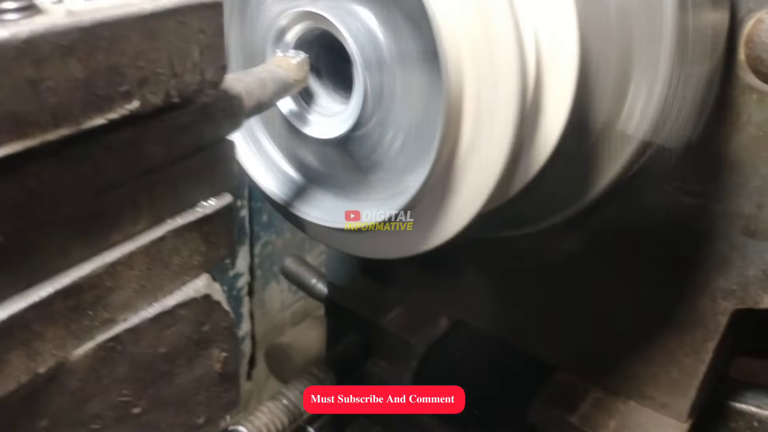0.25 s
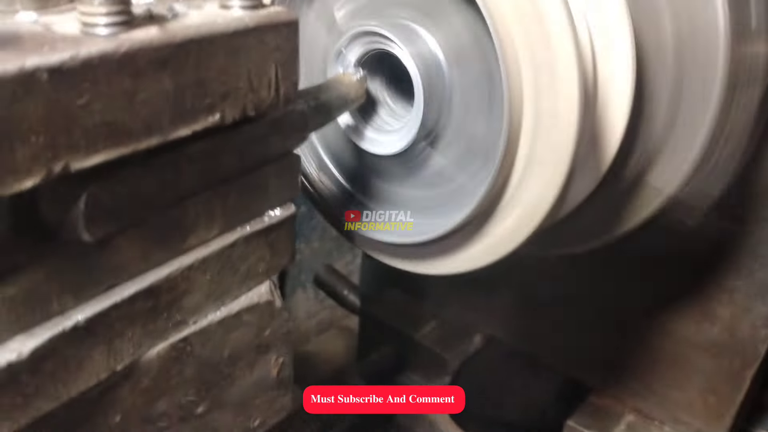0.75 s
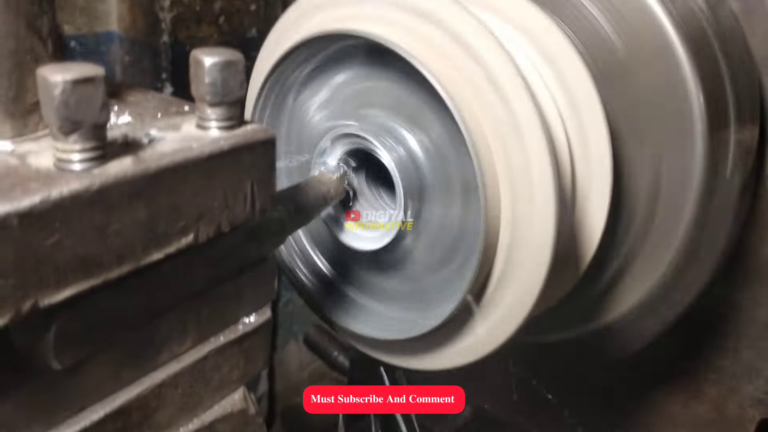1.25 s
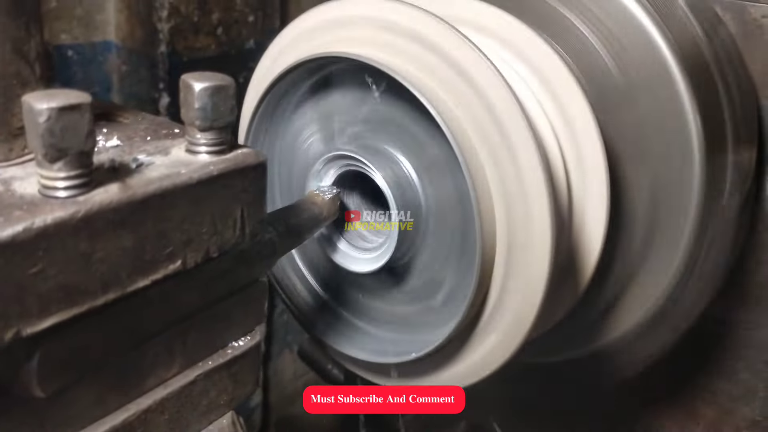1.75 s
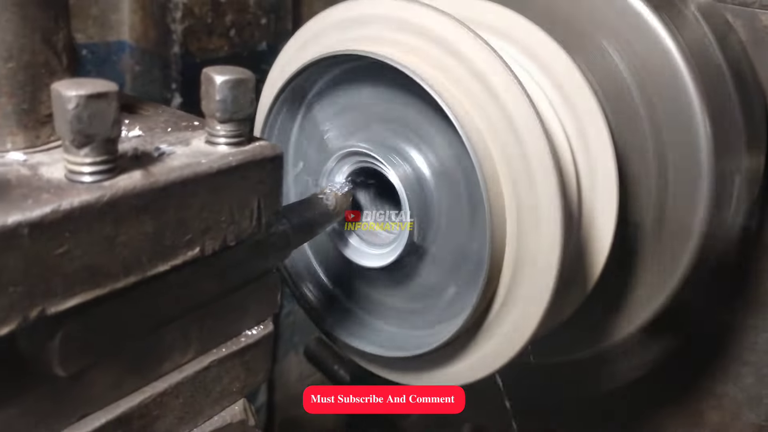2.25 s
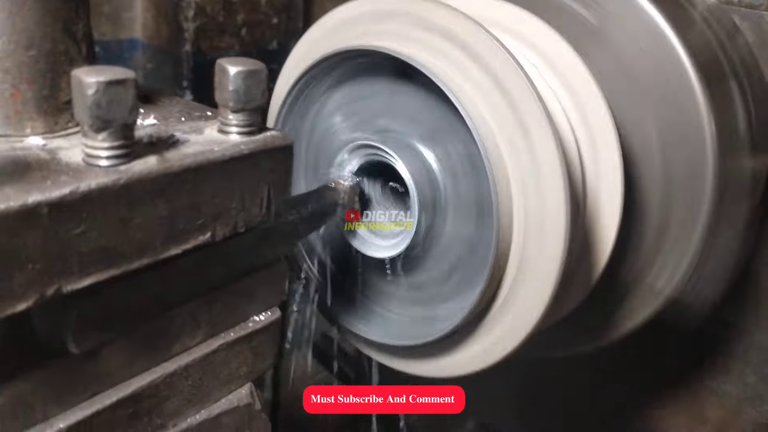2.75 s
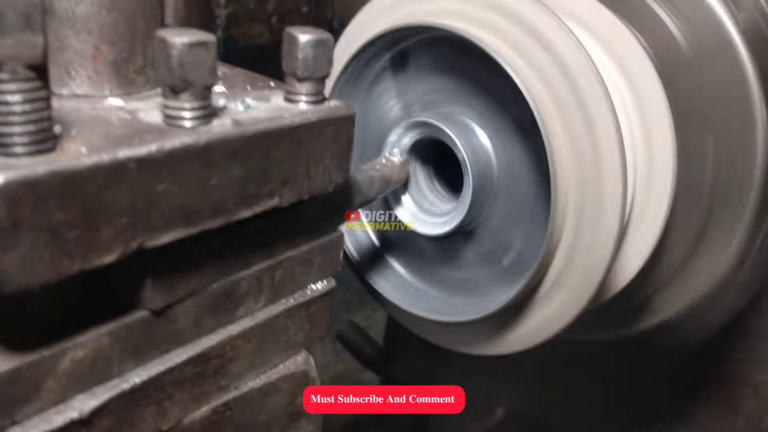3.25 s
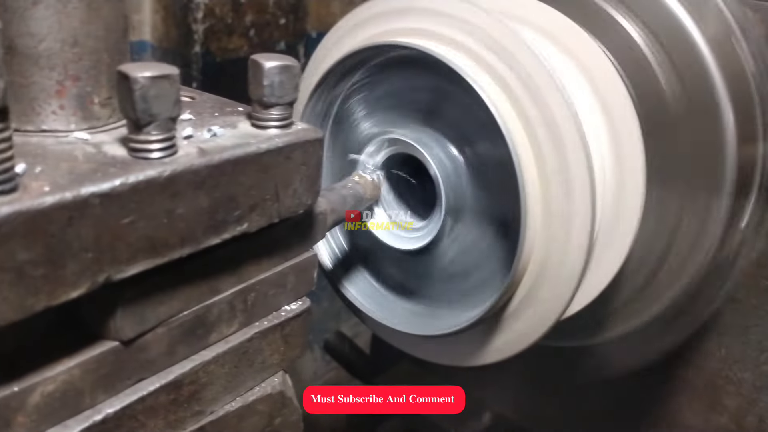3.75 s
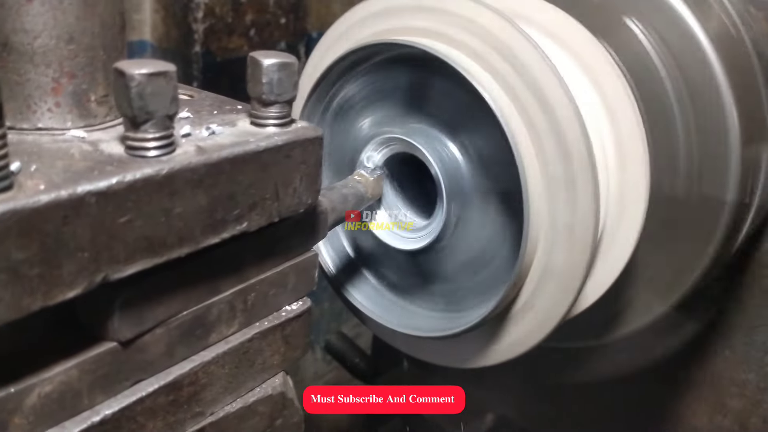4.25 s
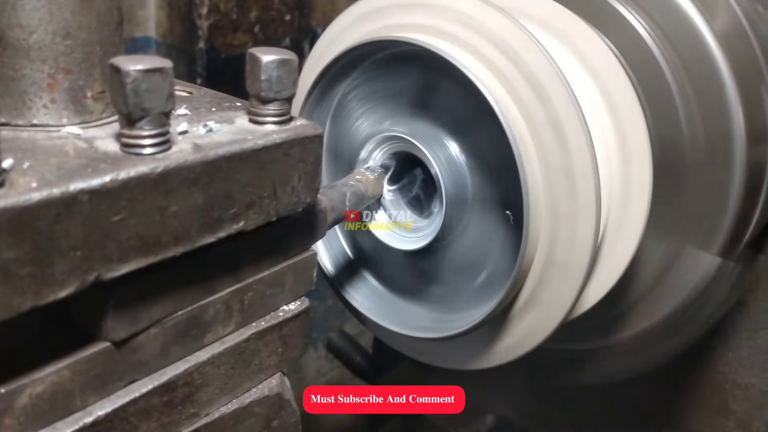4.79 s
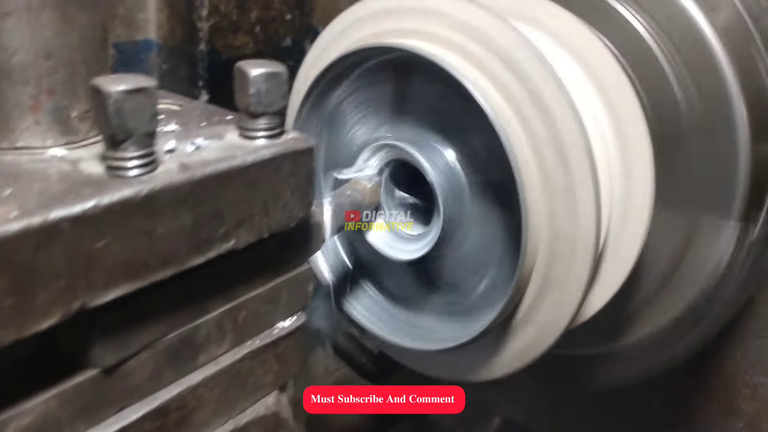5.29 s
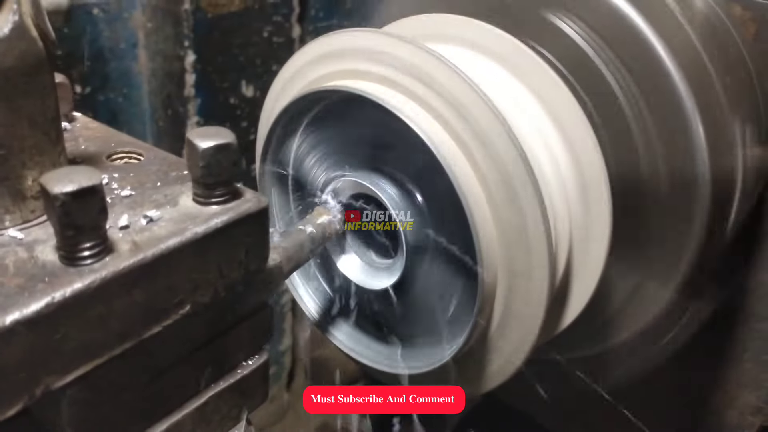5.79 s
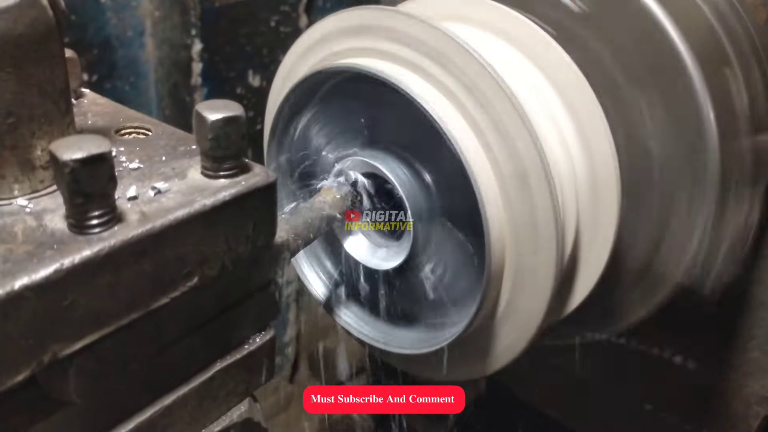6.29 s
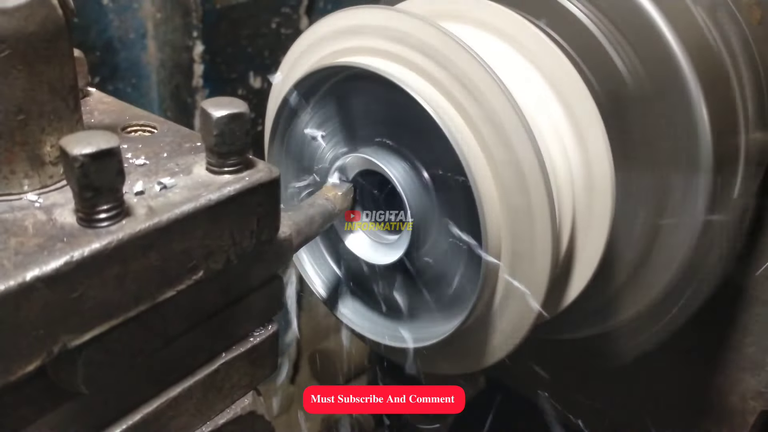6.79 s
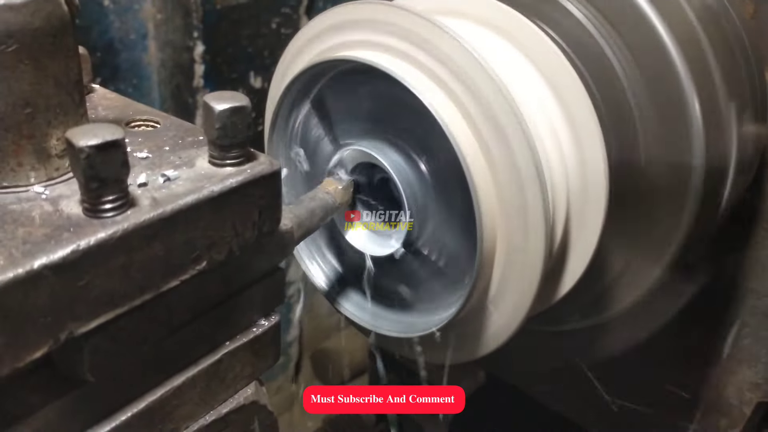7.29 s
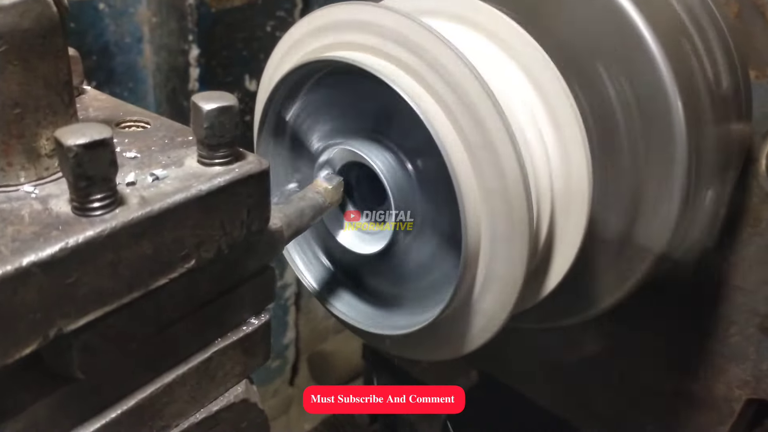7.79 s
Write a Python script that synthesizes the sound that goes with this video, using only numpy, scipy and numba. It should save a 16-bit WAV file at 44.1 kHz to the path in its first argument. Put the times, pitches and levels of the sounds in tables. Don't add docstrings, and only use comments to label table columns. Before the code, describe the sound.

Close beside an old metal lathe in a workshop, the drive hums and rumbles with rapid, uneven gear knocks. A boring tool rasps lightly inside a spinning metal wheel in two passes, chips sizzling and the tip ringing in bursts. Then it locks into a very loud, piercing squeal, stuttering and wavering, pushing everything else down, until the edge leaves and only faint ringing and machinery remain.

```python
import sys
import numpy as np
from scipy import signal
from scipy.fft import rfft, irfft, next_fast_len
from scipy.io import wavfile
from scipy.ndimage import uniform_filter1d, minimum_filter1d, map_coordinates
from numba import njit

SR = 44100
rng = np.random.default_rng(int(sys.argv[2]) if len(sys.argv) > 2 else 0)


def wav_out(sig):
    wavfile.write(sys.argv[1], SR, np.round(np.clip(np.atleast_2d(sig).T, -1, 1) * 32767).astype(np.int16))


def voltage_ratio(level):
    return 10 ** (np.asarray(level, float) / 20)


N = 354563

# time_s, level_db
SQUEAL_LEVEL = [(5.002, -13), (5.25, -11.5), (5.548, -15.5), (6.0, -11), (6.18, -10.5), (6.448, -6),
                (7.151, -9), (7.6, -12.5), (7.64, -27), (7.72, -40), (7.781, -38)]
# time_s, pitch_hz
SQUEAL_PITCH = [(5.05, 2780), (5.087, 2725), (5.115, 2770), (5.14, 2728), (5.185, 2790), (5.25, 2780),
                (5.283, 2722), (5.36, 2805), (5.425, 2705), (5.49, 2800), (5.565, 2740), (5.63, 2795),
                (5.697, 2700), (5.775, 2820), (5.835, 2695), (5.92, 2760), (5.98, 2680), (6.08, 2770),
                (6.125, 2700), (6.16, 2735), (6.22, 2690), (6.3, 2745), (6.45, 2762), (6.54, 2728),
                 (6.73, 2772), (6.8, 2725), (6.92, 2762), (6.97, 2735), (7.04, 2765), (7.11, 2722),
                 (7.2, 2740), (7.29, 2785), (7.38, 2730), (7.475, 2705), (7.575, 2825), (7.65, 2775)]
# time_s, depth_db, width_ms
SQUEAL_DIPS = [(5.114, -8.5, 8.8), (5.169, -21, 18), (5.179, -9.5, 5.1), (5.18, -3, 68), (5.22, -26, 5.8),
                    (5.228, -4.5, 45), (5.319, -22, 11), (5.338, -10, 5.5), (5.355, -12, 61),
                    (5.358, -10.5, 5), (5.366, -14, 2.5), (5.385, -15, 12), (5.446, -2, 14), (5.462, -11.5, 6),
                    (5.479, -11.5, 9.5), (5.485, -8, 34), (5.505, -11, 14), (5.526, -20.5, 3.4),
                    (5.572, -3, 11), (5.592, -6, 11), (5.608, -17, 5.2), (5.634, -5, 12), (5.67, -16, 5.4),
                    (5.727, -15, 11), (5.756, -5.5, 8.7), (5.778, -14.5, 4.7), (5.79, -19.5, 2.9),
                    (5.804, -17.5, 4.1), (5.845, -15.5, 2.4), (5.857, -14, 5.2), (5.877, -10, 9),
                    (5.899, -1.5, 15), (5.935, -12, 5.1), (5.949, -8, 7.7), (5.99, -8.5, 3.2),
                    (6.023, -6.5, 7), (6.043, -6.5, 5.5), (6.064, -21.5, 4.6), (6.072, -17.5, 5),
                    (6.075, -3.5, 52), (6.091, -15, 2.5), (6.104, -13.5, 2.8), (6.128, -5.5, 4),
                    (6.152, -2.5, 15), (6.176, -15.5, 6.7), (6.205, -6.5, 26),
                    (6.226, -20, 21), (6.358, -9, 17), (6.451, -1, 15), (6.501, -20, 11), (6.519, -7, 4.2),
                       (6.562, -6, 22), (6.592, -5, 9.6), (6.636, -11.5, 15), (6.667, -1.5, 4.8), (6.734, -2, 11),
                       (6.785, -13.5, 16), (6.838, -0.5, 18), (6.871, -4.5, 11), (6.916, -6, 26),
                       (6.945, -1, 7.7), (6.982, -8, 4.6), (7.015, -7.5, 17), (7.056, -14.5, 23),
                       (7.087, -4.5, 20), (7.108, -6, 6), (7.119, -12.5, 6.7), (7.131, -6, 3.5),
                       (7.156, -15, 4.2), (7.166, -5.5, 4.4), (7.201, -11, 20), (7.242, -9.5, 4.5), (7.26, -8, 5),
                       (7.274, -22, 3.8), (7.28, -5, 5.4), (7.295, -13, 13), (7.309, -12, 4.6), (7.339, -10, 5.4),
                       (7.394, -22.5, 3.4), (7.41, -14.5, 19), (7.42, -5, 71), (7.431, -7, 3.9), (7.484, -22, 6),
                       (7.53, -12, 8), (7.548, -24.5, 10), (7.557, -19, 6.7), (7.565, -8.5, 73),
                       (7.583, -16, 4.9), (7.594, -13, 4.6), (7.626, -18, 15), (7.654, -13, 8.5),
                    (5.062, -5, 20), (5.236, -4.5, 25), (5.392, -7.5, 11), (5.453, -7.5, 15), (6.235, -3, 9.1),
               (6.489, -3, 30), (6.62, -1.5, 35), (6.77, -3, 32), (6.9, -2.5, 30), (7.44, -2.5, 32)]
# time_s, firm_grip_gain_db, blur (0-1)
RUNOUT = [
    (5.0, 4, 0.07),
    (5.35, 2.5, 0.14),
    (5.7, 3.5, 0.1),
    (6.1, 0.5, 0.3),
    (6.3, -2, 0.13),
    (6.55, -2, 0.21),
    (7.0, -3, 0.17),
    (7.15, 1.5, 0.19),
    (7.55, 1, 0.14),
]
# time_s, level_db
SLAP_LEVEL = [
    (5.05, -58),
    (5.6, -56.5),
    (5.9, -48),
    (6.13, -45),
    (6.3, -36),
    (6.5, -35),
    (7.0, -38),
    (7.3, -45),
    (7.77, -63.5),
]
# time_s, change_db, width_ms
SLAP_SPELLS = [(5.09, 5, 40), (5.14, 7, 30), (5.285, 13, 55), (5.34, 6, 20), (5.435, 11.5, 45),
               (5.565, 2.5, 40), (5.71, 10.5, 50), (5.86, 3.5, 50), (5.965, 13, 35), (6.03, 7.5, 40),
               (6.185, 13.5, 70), (6.26, 3.5, 40), (6.35, -7, 15), (6.53, 0.5, 60), (6.73, -4, 25),
               (6.8, 0.5, 30), (6.87, 1, 30), (6.91, -4, 25), (6.97, 1.5, 25), (7.03, -0.5, 40),
               (7.1, 4, 30), (7.18, 5.5, 40), (7.24, -3, 20), (7.265, 5, 20), (7.36, 7.5, 60),
               (7.47, 19, 40), (7.56, 7, 30), (7.61, 3, 30)]
# multiple, level_db
OVERTONES = [
    (3, -6),
    (4, -0.5),
    (5, -2),
]
# time_s, level_db
HARSHNESS = [
    (5.05, 4),
    (5.5, 2.5),
    (6.1, 0.5),
    (6.25, 2),
    (7.15, 0.5),
    (7.3, -4),
    (7.47, -6),
    (7.6, -3),
]
# time_s, bite_db, chip_heat_db
CUT_FORCE = [(0, -33, -85.5), (.39, -41, -92), (.41, -24, -72.5), (.9, -24.5, -77), (1.5, -25.5, -73),
             (2.2, -27, -67), (2.48, -26.5, -71), (2.58, -38.5, -89), (3.3, -37.5, -89.5),
             (3.38, -27, -72.5), (3.8, -24, -74.5), (4.8, -23, -74.5), (4.86, -24, -66),
             (5.5, -26.5, -57.5), (6.1, -28, -57.5), (6.35, -30, -57.5), (7.2, -33, -58.5),
             (8.04, -35, -73.5)]
# centre_hz, width_hz, level_db
BAR_MODES = [
    (1128, 190, -6.5),
    (1833.6, 56, 5),
    (2507, 530, -4),
    (2840, 140, -3),
    (2400, 2930, -6.5),
]
# centre_hz, width_hz, level_db
CHIP_MODES = [
    (3702, 46, -4),
    (4500, 300, -20),
    (4910, 360, -18.5),
    (5450, 760, -24.5),
    (6540, 36, -32),
    (7370, 120, -26),
    (8090, 60, -31),
]
# pitch_hz, level_db (per Hz)
CHIP_BED = [(1710, -18), (2900, -1.5), (3100, -21), (3300, -15), (3710, -14), (4180, -27), (7410, -42.5),
            (9000, -50), (11700, -85), (19800, -120)]
# centre_hz, width_hz, level_db
SIZZLE_MODES = [(6370, 400, -5), (7170, 230, -2.5), (8050, 250, -6), (9720, 330, -3), (10440, 300, -4),
                (11350, 440, -8.5), (11950, 540, -4.5), (13000, 200, -14), (13600, 400, -4.5)]
# centre_hz, width_hz, level_db
TOP_MODES = [
    (14450, 200, 3),
    (14300, 1200, -6.5),
    (15400, 80, -4.5),
]
# time_s, depth_db, width_ms
SKIPS = [
    (.43, -18, 11),
    (.465, -10.5, 18),
    (.5, -15, 18),
    (.545, -5, 11),
    (3.357, -14, 12),
]
# time_s, level_db
CHIP_SNAP = [
    (4.8635, -24),
]
# time_s, centre_hz, level_db
TIP_RINGING = [
    [(.4, 2630, -21), (.6, 2637, -30), (1, 2622, -28), (1.58, 2675, -27.5), (1.95, 2698, -20.5),
     (2.4, 2712, -25), (2.53, 2560, -28)],
    [(3.33, 2620, -19), (3.4, 2582, -19.5), (3.75, 2616, -24), (4, 2690, -19), (4.3, 2636, -24.5),
     (4.55, 2690, -21), (4.8, 2787, -18.5), (5.04, 2776, -18.5)],
    [(7.66, 2830, -30), (7.72, 2840, -20), (7.8, 2865, -21), (7.89, 2853, -22), (8.04, 2840, -32)],
]
# wide_band_share, burst_depth_db, burst_time_s
TIP_KIND = [
    (1.5, 3.5, 0.0037),
    (1.5, -0.4, .012),
    (0.23, 3.5, 0.017),
]
# start_s, peak_db, pitch_hz
GRABS = [(0.4124, -16, 2510), (0.443, -9.5, 2310), (0.4747, -14, 2650), (0.5176, -15, 2600),
         (0.564, -4, 2380), (0.686, -12, 2370), (1.0833, -13, 2310), (1.1202, -6.5, 2390),
         (1.2547, -12, 2410), (1.6859, -12, 2350), (1.7653, -9.5, 2600), (1.9716, -4, 2640),
         (2.1134, -11, 2690), (2.1469, -4.5, 2740), (2.302, -19, 2670), (2.6597, -16, 2640),
         (2.8855, -24, 2390), (3.1576, -23, 2370), (3.34, -18, 2660), (3.386, -14, 2580),
         (3.5129, -8, 2610), (3.6022, -11, 2430), (3.7923, -10.5, 2700), (3.8992, -10, 2650),
         (4.0215, -16, 2680), (4.131, -16, 2570), (4.2905, -13, 2570), (4.8554, -11, 2830),
         (4.981, -8, 2830), (5.0533, 0, 2780)]
# start_s, peak_db
BAR_JOLTS = [(0.4067, -19), (0.5107, -10), (1.0615, -18), (1.207, -13), (1.254, -18), (1.445, -16),
             (1.627, -12), (1.7654, -20), (1.906, -11), (2.0427, -21), (2.0975, -12), (2.188, -15),
             (2.4646, -13), (2.6547, -14), (2.8827, -13), (3.1612, -18), (3.273, -12), (4.1414, -5),
             (4.224, -17), (4.293, -18), (6.8207, -12.5), (7.3802, -14), (7.5276, -21), (7.662, -17),
             (7.7137, -13), (7.991, -22)]
# time_s, pitch_hz, level_db
SHANK_HUM = [
    (.5, 2370, -36),
    (.56, 2370, -28),
    (1.15, 2365, -25.5),
    (1.3, 2330, -32),
    (1.75, 2330, -27),
    (2.0, 2370, -28),
    (2.5, 2310, -35),
]
# time_s, level_db
HOLDER_WHISTLE = [
    (3.37, -56),
    (3.6, -60),
    (3.8, -62.5),
    (4.4, -67),
]
# start_s, peak_db, thud_db, ring_db
LIGHT_KNOCKS = [(.232, -4, 0, -9), (.354, -10, -1, -6), (.508, -6.5, 3, -6), (.648, -3.5, -15, -8),
                (.793, -2.5, -4, -9), (.927, -3.5, -11, -8), (1.207, -1.5, -18, -10),
                (1.323, -20, -11, -22), (1.487, -3.5, -7, -9), (1.628, -6, -19, -7), (1.766, -2.5, -3, -11),
                (1.907, -3.5, 1, -4.5), (2.046, -7, -1, -17), (2.187, -3.5, -1, -4),
                (2.329, -5.5, 0.5, -3.5), (2.463, -6.5, -2.5, -12), (2.606, -5.5, 0, -13),
                (2.718, -17, -13, 3), (2.881, -4, -1.5, -8.5), (2.998, -18.5, -14, 5),
                (3.158, -3, 0.5, -9.5), (3.273, -5.5, -2.5, -19), (3.573, -3, -6.5, -17),
                (4.221, -8.5, -20, -12), (4.791, -7.5, -1.5, -17)]
# start_s, peak_db
LOADED_KNOCKS = [(5.352, -9.5), (5.843, -6.5), (6.121, -5.5), (6.26, -5), (6.403, -14), (6.687, -5),
                 (6.823, -3), (7.102, -5.5), (7.243, -7), (7.381, -3), (7.528, -3.5), (7.664, -3),
                 (7.805, -14), (7.928, -7)]
# start_s, peak_db
REBOUNDS = [(.071, -9), (.565, -22), (.972, -5.5), (1.141, -12), (1.254, -5.5), (1.819, -8), (1.981, -12.5),
            (2.095, -5), (2.652, -5), (3.226, -13), (3.646, -9), (4.074, -11), (4.756, -23), (6.17, -9.5),
            (7.459, -7), (7.6, -6.5), (7.712, -1.5), (7.99, -10)]
# start_s, peak_db
PINGS = [
    (1.061, -12),
    (3.889, -13.5),
    (4.001, -13.5),
    (4.141, -16.5),
    (4.606, -16.5),
    (5.03, -15),
]
# pitch_hz, level_db, t60_s
CASING_MODES = [(346.7, -12.5, 0.33), (527, -11.5, 0.19), (653, -4.5, 0.11), (722, -13, 0.17),
                (976, 3.5, 0.13), (1049, 3.5, 0.18), (1253, 5.5, 0.11), (1465, -8, 0.14), (1480, -1, 0.012),
                (1803, 7.5, 0.072), (2320, -4, 0.063)]
# start_s, peak_db
CRACKS = [(0.2325, -14), (0.511, -7), (.649, -17), (1.209, -4), (1.2554, -2), (1.765, -10), (1.818, -4.5),
          (1.906, -2), (2.042, -7), (2.188, -3), (2.652, -8), (2.881, -21), (3.158, -7), (7.662, -8),
          (7.713, -7), (.928, -11), (6.263, -11), (6.69, -6), (6.826, -10), (7.104, -9), (7.93, -24),
          (7.993, -18)]
# pitch_hz, level_db, t60_s
TOOTH_MODES = [
    (1690, 0, 0.018),
    (2320, -7.5, 0.019),
    (912, -6.5, 0.013),
    (567, -13, 0.05),
]
# pitch_hz, level_db, upper_sideband_share, lower_sideband_share (belt sidebands)
MOTOR_LINES = [
    (71.2, -36, 0.58, 0.12),
    (101.6, -37, .05, .05),
    (108.6, -44, 0.37, .1),
    (110.8, -48, 0.39, 0.55),
]
# time_s, level_db
RUMBLE_LEVEL = [(0, -23.5), (1, -27.5), (2, -24.5), (2.6, -25.5), (3.3, -25), (3.8, -30), (5, -31),
                (6, -27.5), (7.4, -27), (7.7, -24), (8.04, -28)]
# pitch_hz, level_db (per Hz)
RUMBLE_COLOUR = [(20, -14), (52, -20), (62, -12), (90, -12), (170, -10.5), (240, -17.5), (400, -15),
                 (560, -10), (1600, -12.5), (2310, -17.5), (2900, -30), (3300, -42), (9000, -70.5),
                 (16000, -100)]
# centre_hz, width_hz, level_db
GEAR_MODES = [
    (115, 25, -38),
    (157.3, 11, -29.5),
    (176.9, 7.3, -32),
    (210, 30, -39),
    (328, 82, -37.5),
    (564, 92, -37.5),
    (1030, 22, -35.5),
    (1760, 56, -41),
]


def unit(x):
    return x / np.sqrt(np.mean(x ** 2) + 1e-20)


def along(points, hz):
    f, v = np.transpose(points)
    return np.interp(np.log(hz + 1), np.log(f + 1), v, left=-120, right=-120)


def curves(rows):
    s, *cols = np.transpose(rows)
    return [np.interp(np.arange(N) / SR, s, c) for c in cols]


def during(rows, fade):
    t = np.arange(N) / SR
    fade_in = np.clip((t - rows[0][0]) / fade, 0, 1)
    fade_out = np.clip((rows[-1][0] + fade - t) / fade, 0, 1)
    return fade_in * fade_out


def dips(rows):
    t = np.arange(N) / SR
    return sum(depth * np.exp(-(np.where(t > s, 2600, 1700) * (t - s) / ms) ** 2) for s, depth, ms in rows)


def wobble(rate):
    knots = rng.standard_normal(int(N * rate / SR) + 4)
    return map_coordinates(knots, [np.arange(N) * rate / SR])


def smear(rate):
    return wobble(rate) + 1j * wobble(rate)


def humps(peaks, hz):
    return np.sqrt(sum(voltage_ratio(2 * db) / (1 + (2 * (hz - c) / w) ** 2) ** 2 for c, w, db in peaks))


def hiss(gain, patchy_db, grain_db):
    grain = np.pad(voltage_ratio(grain_db * wobble(300)), (0, 512))
    _, _, z = signal.stft(rng.standard_normal(N + 512) * grain, SR, nperseg=512)
    field = uniform_filter1d(rng.standard_normal(z.shape), 5, 0)
    field = uniform_filter1d(field, 6, 1)
    patchy = signal.istft(z * voltage_ratio(patchy_db * unit(field)), SR, nperseg=512)[1][:N]
    m = next_fast_len(N + 8192)
    colour = gain(np.fft.rfftfreq(m, 1 / SR))
    return unit(irfft(rfft(patchy, m) * colour, m)[:N])


def rings(rows, attack_s, t60, lift_db):
    out, t = np.zeros(N + SR), np.arange(SR // 5) / SR
    for s, db, hz in rows:
        drift = np.cumsum(uniform_filter1d(rng.standard_normal(len(t)), size=300)) * 0.0067
        envelope = voltage_ratio(db + lift_db - 60 * t / t60) * (1 - np.exp(-t / attack_s))
        out[round(s * SR):][:len(t)] += envelope * np.sin(2 * np.pi * hz * t + drift)
    return out[:N]


def squeal():
    lock_s, runout_hz, firm_s = 5.047, 7.165, 5.42
    (db,), (second_db,) = curves(SQUEAL_LEVEL), curves(SLAP_LEVEL)
    second_db = second_db + dips(SLAP_SPELLS)
    hz = uniform_filter1d(curves(SQUEAL_PITCH)[0], size=700)
    grip_db, blur = curves(RUNOUT)
    firm = np.cos(2 * np.pi * runout_hz * (np.arange(N) / SR - firm_s))
    db = db + grip_db * firm
    high_db = curves(HARSHNESS)[0] - 14
    slip_db = dips(SQUEAL_DIPS)

    rough = np.clip(blur - 0.015 * (db + slip_db + 2.5), 0, 1)
    spin = np.exp(2j * np.pi * np.cumsum(hz + 6 * wobble(45) + 25 * rough * wobble(60)) / SR)
    level = voltage_ratio(db + 14.5 + slip_db) * during([[lock_s], SQUEAL_LEVEL[-1]], 0.025)
    flutter = 1 + 0.63 * rough * wobble(170)
    flutter = flutter + 0.12 * smear(45) + 0.054 * smear(350) + 0.0058 * smear(1000)
    tone = np.exp(1.4j * rough * wobble(170)) * flutter * spin

    firm_hz = uniform_filter1d(minimum_filter1d(hz, size=5000), size=3000)
    slap_hz = 0.49 * (hz - firm_hz) + firm_hz + 6 + 4 * wobble(30) + 7 * wobble(220)
    slap_spin = np.exp(2j * np.pi * np.cumsum(slap_hz) / SR)
    second = voltage_ratio(second_db + 0.68 * wobble(30)) * (1 + 0.61 * smear(120)) * slap_spin ** 2
    high = sum(voltage_ratio(k_db + 2.2 * wobble(35)) * (1 + 0.6 * smear(260)) * slap_spin ** k for k, k_db in OVERTONES)
    high = voltage_ratio(second_db + high_db + .15 * slip_db) * high
    slaps = voltage_ratio(10.0 + .15 * slip_db) * (second + high)
    return np.real(level * tone + during(SLAP_LEVEL, .03) * slaps)


def cut():
    rasp_db, sizzle_db = curves(CUT_FORCE)
    bite_db, heat_db = rasp_db + 24, sizzle_db + 75
    chip_db = -46.5 + 0.3 * bite_db + 0.57 * heat_db
    bite = voltage_ratio(dips(SKIPS) + 0.3 * wobble(28) + 0.73 * wobble(6.9))

    def bar_colour(hz):
        return humps(BAR_MODES, hz) / (1 + (hz / 3000) ** 24)

    def chip_colour(hz):
        return np.hypot(0.6 * humps(CHIP_MODES, hz), voltage_ratio(along(CHIP_BED, hz)))

    def sizzle_colour(hz):
        return np.hypot(humps(SIZZLE_MODES, hz), 0.13 * (hz > 5500))

    rasp = voltage_ratio(rasp_db + 3.5) * hiss(bar_colour, patchy_db=2.0, grain_db=-1)
    chips = voltage_ratio(chip_db + 9.0) * hiss(chip_colour, patchy_db=1.5, grain_db=2.0)
    sizzle = voltage_ratio(sizzle_db + 8.5) * hiss(sizzle_colour, patchy_db=-2.0, grain_db=1.0)
    top_level = np.hypot(voltage_ratio(-71.5 + 1.05 * heat_db), voltage_ratio(-79))
    top = top_level * hiss(lambda hz: humps(TOP_MODES, hz), patchy_db=0.5, grain_db=-2.0)
    snap = np.zeros(N)
    for s, db in CHIP_SNAP:
        snap[round(s * SR):][:5] = voltage_ratio(db) * np.array([1, .7, -.3, -.8, -.5])
    return bite * (rasp + chips + sizzle + top) + snap


def tip():
    burst_hz = 28.6
    t = np.arange(N) / SR
    out = np.zeros(N)
    for rows, (wide, depth_db, burst_s) in zip(TIP_RINGING, TIP_KIND):
        hz, db = curves(rows)
        bursts = voltage_ratio(depth_db * np.cos(2 * np.pi * burst_hz * (t - burst_s)) + 2.7 * wobble(30))
        spin = np.exp(2j * np.pi * np.cumsum(hz) / SR)
        band = unit(np.real((smear(95) + wide * smear(420)) * spin))
        out += during(rows, 0.016) * voltage_ratio(db - 2.5) * bursts * band
    low_pass = signal.butter(10, 2970, fs=SR, output="sos")
    return signal.sosfiltfilt(low_pass, out) * voltage_ratio(dips(SKIPS))


def grabs():
    tip_rings = rings(GRABS, attack_s=.005, t60=0.08, lift_db=-1.0)
    bar_rings = rings([(*row, 1787) for row in BAR_JOLTS], attack_s=.004, t60=.12, lift_db=-2.0)
    return tip_rings + bar_rings


def shank():
    hz, db = curves(SHANK_HUM)
    band = unit(np.real(smear(110) * np.exp(2j * np.pi * np.cumsum(hz) / SR)))
    return during(SHANK_HUM, .03) * voltage_ratio(db + 0.73 * wobble(25)) * band


def holder():
    whistle_hz = 4930
    band = unit(np.real(smear(90) * np.exp(2j * np.pi * whistle_hz * np.arange(N) / SR)))
    return during(HOLDER_WHISTLE, .02) * voltage_ratio(curves(HOLDER_WHISTLE)[0] + 2.5 * wobble(25)) * band


def knocks():
    out, t = np.zeros(N + SR), np.arange(SR // 3) / SR
    blows = LIGHT_KNOCKS + [(*row, -3.5, -9.5) for row in LOADED_KNOCKS]
    blows = blows + [(*row, -3.5, -12) for row in REBOUNDS] + [(*row, -20, 4.5) for row in PINGS]
    for s, db, thud_db, ring_db in blows:
        ring = 0
        for hz, level, t60 in CASING_MODES:
            loud, detune, phase = rng.standard_normal(3)
            blow_db = np.interp(hz, [686, 900, 1730, 1848], [thud_db + 11.5, 0, 0, ring_db + 14.0])
            decay = voltage_ratio(level + 0.95 * loud + blow_db - 60 * t / t60)
            ring = ring + decay * np.sin(2 * np.pi * (hz * (1 + 0.0088 * detune) * t + phase))
        rattle = (4.3 * voltage_ratio(-60 * t / 0.14) + 1.7 * voltage_ratio(-60 * t / 0.02)) * rng.standard_normal(len(t))
        rattle += 5 * voltage_ratio(-60 * t / 0.47) * uniform_filter1d(rng.standard_normal(len(t)), size=22)
        attack = 1 - np.exp(-t / 0.00074)
        out[round(s * SR):][:len(t)] += voltage_ratio(db - 19.5) * attack * (ring + rattle)
    soft = signal.butter(8, [250, 2700], "band", fs=SR, output="sos")
    edge = signal.butter(2, [2500, 6000], "band", fs=SR, output="sos")
    return signal.sosfilt(soft, out[:N]) + voltage_ratio(-37.0) * signal.sosfilt(edge, out[:N])


def cracks():
    out, t = np.zeros(N + SR), np.arange(SR // 20) / SR
    shape = sum(voltage_ratio(db - 60 * t / t60) * np.sin(2 * np.pi * hz * t) for hz, db, t60 in TOOTH_MODES)
    shape = shape * (1 - np.exp(-t / 0.00076))
    for s, db in CRACKS:
        out[round(s * SR):][:len(t)] += voltage_ratio(db) * shape
    return out[:N]


def drive():
    belt_hz, throb_s = 3.45, .01
    t = np.arange(N) / SR
    belt = np.exp(2j * np.pi * belt_hz * (t - throb_s))
    hum = np.zeros(N)
    for hz, db, up, down in MOTOR_LINES:
        line = np.exp(2j * np.pi * hz * t + .3j * wobble(3.3))
        throb = 1 + up * belt + down / belt
        hum += voltage_ratio(db + 3.0 + 0.35 * wobble(2.6)) * np.real(line * throb)
    casing = voltage_ratio(-31.5) * hiss(lambda hz: humps(GEAR_MODES, hz), patchy_db=1.5, grain_db=5.5)
    shop = hiss(lambda hz: voltage_ratio(along(RUMBLE_COLOUR, hz)), patchy_db=2.0, grain_db=2.5)
    shop = voltage_ratio(curves(RUMBLE_LEVEL)[0]) * shop
    return hum + voltage_ratio(0.86 * wobble(14)) * (casing + shop)


def scene():
    cutting = squeal() + cut() + tip() + grabs() + shank() + holder()
    lathe = knocks() + cracks() + drive()
    return (cutting + lathe)[None]


@njit
def recover(need, step):
    gain = need.copy()
    for i in range(1, len(gain)):
        gain[i] = min(need[i], gain[i - 1] + step * (1 - gain[i - 1]))
    return gain


def band_limit(x):
    return signal.sosfilt(signal.butter(12, 15920, fs=SR, output="sos"), x)


def record(dry):
    ceiling, release_s = .985, .1
    need = np.minimum(1, ceiling / (np.abs(dry[0]) + 1e-9))
    gain = recover(minimum_filter1d(need, size=1100), 1 / (release_s * SR))
    band = signal.ellip(10, .1, 60, 15450, fs=SR, output="sos")
    heard = signal.sosfiltfilt(band, dry * uniform_filter1d(gain, size=250))
    return band_limit(heard)


dry = scene()
out = record(dry)
wav_out(out)
```